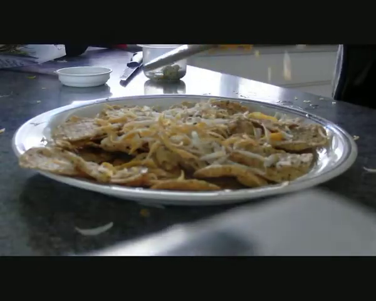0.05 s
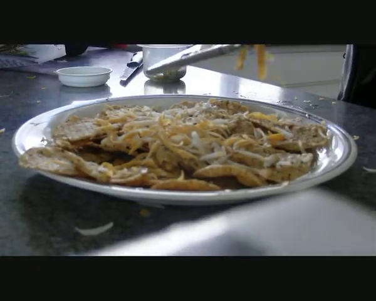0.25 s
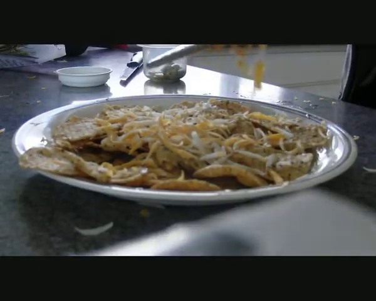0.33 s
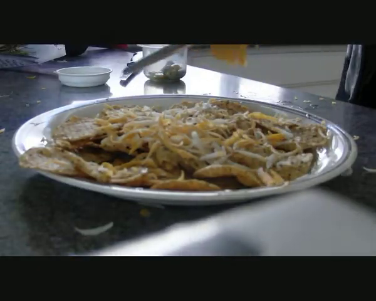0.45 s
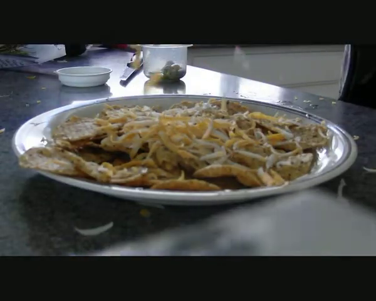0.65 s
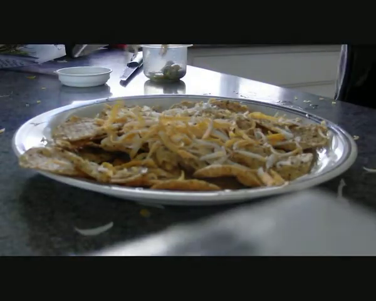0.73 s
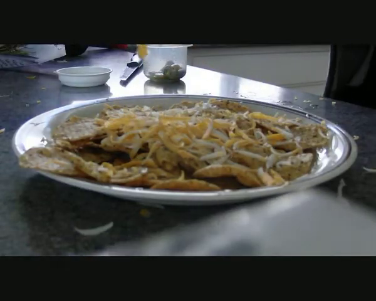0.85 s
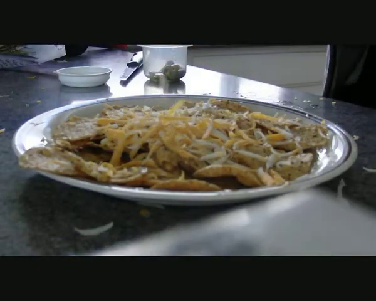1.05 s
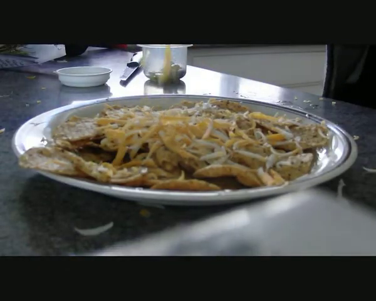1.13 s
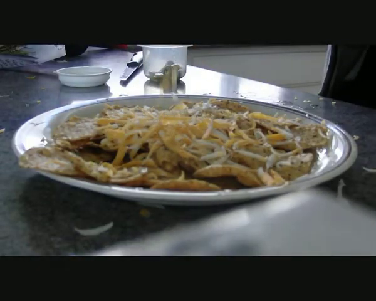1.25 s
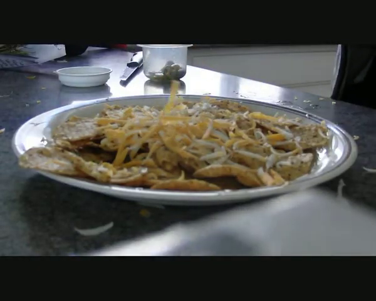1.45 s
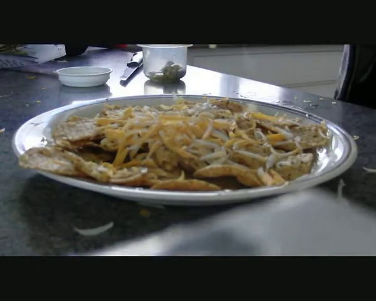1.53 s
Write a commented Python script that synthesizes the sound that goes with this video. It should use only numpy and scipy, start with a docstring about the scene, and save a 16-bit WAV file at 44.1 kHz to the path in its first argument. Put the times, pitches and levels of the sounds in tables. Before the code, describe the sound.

Shredded cheese falling onto tortilla chips with faint dry ticks and a light rustle.

```python
"""Shredded cheese is sprinkled over a plate of tortilla chips in a quiet kitchen.
From the start an appliance hums under the low rush of the room, and loose shreds rustle on the chips.
Single impacts follow, each exciting a chip's damped modes for a few cycles: a dry tick.
A touched metal utensil rings faintly, then clumps land with soft pats. After about a second
the ticks thin out. The walls add a faint reverberation throughout."""
import sys
import numpy as np
from scipy import signal
from scipy.fft import rfft, irfft
from scipy.io import wavfile

SR = 44100
rng = np.random.default_rng(int(sys.argv[2]) if len(sys.argv) > 2 else 0)


def log_audio(samples):
    """Write samples as a 16-bit WAV file to the path given in sys.argv[1]."""
    # one column per channel
    frames = np.atleast_2d(samples).T
    # limit to full scale, then quantise
    limited = np.clip(frames, -1, 1)
    pcm = np.round(limited * 32767).astype(np.int16)
    wavfile.write(sys.argv[1], SR, pcm)


N = 70560
T = np.arange(N) / SR


def from_db(db):
    """Amplitude ratio of a level: tenfold for every 20 dB."""
    return 10 ** (np.asarray(db) / 20)


def unit_energy(x):
    """Normalisation: the squared samples sum to 1."""
    return x / np.sqrt(np.sum(x ** 2) + 1e-20)


def decay(t, t60):
    """Exponential damping: the level falls 60 dB by t = t60."""
    return np.exp(-np.log(1000) * t / t60)


def butterworth(x, hz, kind, order=2):
    """Filtering with a maximally flat passband."""
    return signal.lfilter(*signal.butter(order, hz, kind, fs=SR), x)


def add(out, start_s, sound):
    """Superposition: a sound adds to the mix from its start time."""
    i = int(start_s * SR)
    out[i:i + len(sound)] += sound[:max(N - i, 0)]


def noise(spectrum):
    """Spectral shaping: white noise coloured by (Hz, dB) points, scaled to rms 1."""
    hz, db = np.transpose(spectrum)
    bin_hz = np.maximum(np.arange(N // 2 + 1) * SR / N, 1)
    gain = from_db(np.interp(np.log(bin_hz), np.log(hz), db))
    x = irfft(rfft(rng.standard_normal(N)) * gain, N)
    return x / x.std()


# Spectrum of the room's rush. Each row: frequency in Hz, relative spectral density in dB.
RUSH_SPECTRUM = [(30, -6.5), (90, -5.5), (160, -2), (230, -2), (310, -1.5), (380, -6), (560, -8.5),
                 (800, -12), (1480, -20.5), (2700, -19), (3800, -22), (5700, -30), (9000, -33.5),
                 (16000, -42)]

def room_rush(rms_db=-48.5):
    """Stationary broadband noise, strongest at low frequencies."""
    return from_db(rms_db) * noise(RUSH_SPECTRUM)


# Sustained partials of the appliance. Each row: frequency in Hz, rms level in dB.
HUM_PARTIALS = [(59.6, -68.5), (119.8, -55), (410, -64.5)]
# Envelope of a hum that comes and goes. Each row: time in seconds, rms level in dB.
HUM_SWELLS = [(.85, -62), (.97, -52), (1.14, -69), (1.22, -49.5), (1.32, -81), (1.49, -80), (1.56, -51.5)]

def appliance_hum(swell_hz=298, waver_depth=0.09):
    """Amplitude modulation: each tone wavers slightly at random, and one swells now and then."""
    out = np.zeros(N)
    swell_db = np.interp(T, *np.transpose(HUM_SWELLS))
    for hz, db in [*HUM_PARTIALS, (swell_hz, swell_db)]:
        waver = 1 + waver_depth * noise([(3, 0), (30, -40), (300, -120)])
        tone = np.sqrt(2) * np.sin(2 * np.pi * (hz * T + rng.random()))
        out += from_db(db) * waver * tone
    return out


# Envelope of the rustle. Each row: time in seconds, rms level in dB.
RUSTLE_ENVELOPE = [(0, -55), (.07, -50.5), (.17, -59), (.22, -55), (.44, -51), (.51, -52.5), (.68, -47),
                   (.72, -57.5), (.79, -46), (.87, -49.5), (.92, -58.5), (1.0, -50.5), (1.05, -65),
                   (1.22, -70), (1.33, -52), (1.53, -69)]

def shred_rustle(shreds_per_s=600, spread_db=7, centre_hz=2874, spread_octaves=0.38):
    """Incoherent summation: tiny random impacts of loose shreds on chips merge into a rustle."""
    mode_ratio, upper_db, crack_db = 1.44, 0.5, -15.5
    count = int(shreds_per_s * N / SR)
    starts = rng.uniform(0, T[-1], count)
    size, pitch = np.clip(rng.standard_normal((count, 2)), -2, 2).T
    lower_hz = centre_hz * 2 ** (spread_octaves * pitch)
    ticks = chip_ticks((start, db, hz, hz * mode_ratio, upper_db, crack_db)
                       for start, db, hz in zip(starts, spread_db * size, lower_hz))
    return ticks / ticks.std() * from_db(np.interp(T, *np.transpose(RUSTLE_ENVELOPE)))


# Shreds striking chips. Each row: start in seconds, ring energy before bass loss in dB, lower mode in Hz,
# upper mode in Hz, upper mode relative to lower in dB, crack relative to ring in dB.
CHIP_IMPACTS = [(0.0455, -20.5, 2170, 3620, 17, -10), (0.0781, -18.0, 2380, 5320, 9.5, -16),
                (0.1753, -15.5, 4040, 4800, -15, -18), (0.2021, -10.0, 2310, 5360, 8.5, -17.5),
                (0.2177, -13, 2670, 5200, 0, -16), (0.2963, -13, 4230, 7200, -4.5, -24),
                (0.3399, -15.5, 5170, 8030, -14, -17), (0.37, -21, 3400, 5030, -12, -15),
                (0.3834, -12, 2750, 3400, -16, -34), (0.401, -22, 2440, 3430, -10, -7.5),
                (0.427, -14.0, 2040, 3970, 11.5, -18), (0.4724, -6.5, 3900, 6840, -9.5, -12.5),
                (0.4954, -22, 4280, 9000, 3, -21), (0.5001, -11.5, 4570, 8200, 1.5, -13),
                (0.5104, -13.5, 2610, 5560, 8.5, -20), (0.5575, -9.0, 2300, 4350, 5.5, -28),
                (0.5698, -9, 3330, 4900, -21, -27), (0.5812, 4.5, 2950, 5240, -7.5, -24.5),
                (0.607, -16.5, 2300, 4590, 7, -25), (0.6413, -14, 2900, 2900, -15, -13),
                (0.6455, -7, 2100, 3270, 10, -22), (0.6661, -13.5, 2920, 8450, 4, -6),
                (0.6746, -12, 3970, 5960, -13, -9.5), (0.6803, -14.5, 3750, 4760, -3, -27),
                (0.6891, -18.5, 3260, 3980, -3, -33), (0.7426, -22.5, 3040, 5500, -4, 0),
                (0.7639, -17, 2970, 5680, -2, -14), (0.7659, -15, 2140, 4200, 9, -21),
                (0.8064, -16, 3400, 5240, -9, -18), (0.8102, -10.5, 3450, 6210, 2.5, -9),
                (0.8345, -17.5, 3030, 4990, -21, -34), (0.8508, -16.5, 3570, 5100, 9, -22),
                (0.8684, -17.5, 2820, 4800, 1, -7), (0.96, -18.5, 2880, 3560, 9, -32),
                (0.9694, -14.5, 3030, 4550, 6, -2.5), (0.972, -13.5, 2740, 3730, 7, -17),
                (1.0215, -24, 3470, 5670, 3, -8), (1.0913, -13.0, 2700, 3940, 3.5, -17),
                (1.1425, -19, 3300, 4370, 4, -19), (1.144, -18.0, 3300, 4440, -10, -17),
                (1.2668, -24.5, 5000, 9320, 4, -4), (1.2704, -23, 3180, 5400, 6, -4.5),
                (1.2796, -18.5, 2360, 3430, 9, -21), (1.3257, -24, 3430, 5900, 1, -1),
                (1.3342, -23, 2610, 2780, -2, -1), (1.39, -8.5, 2450, 4420, 11.5, -14.5),
                (1.4635, -20, 2080, 3640, 9, -16), (1.5682, -15.0, 2240, 3400, 14, -14.5)]

def chip_ticks(impacts, t60_cycles=10.2, crack_t60_s=0.0096):
    """Impact excitation: each hit gives a brittle crack and rings two heavily damped modes of a chip."""
    rings, cracks = np.zeros(N), np.zeros(N)
    t = np.arange(512) / SR
    contact_s = 0.0003  # soft cheese takes this long to set a chip ringing
    onset = 1 - np.exp(-t / contact_s)
    hiss = butterworth(rng.standard_normal(N + len(t)), 5350, "high")
    grit = butterworth(hiss, 8600, "low")
    for start, db, lower_hz, upper_hz, upper_db, crack_db in impacts:
        cycles = np.outer([lower_hz, upper_hz], t)
        lower, upper = decay(cycles, t60_cycles) * np.sin(2 * np.pi * cycles)
        ring = onset * (lower + from_db(upper_db) * upper)
        add(rings, start, from_db(db) * unit_energy(ring))
        crack = grit[int(start * SR):][:len(t)] * decay(t, crack_t60_s)
        add(cracks, start, from_db(db + crack_db) * unit_energy(crack))
    return butterworth(rings, 1710, "high", order=4) + cracks  # chips are too small to radiate bass


# Modes of the utensil. Each row: frequency in Hz, relative level in dB, 60 dB decay time in seconds.
METAL_MODES = [(1853, 0, 0.23), (2740, 0, 0.084), (3775, 1, 0.095), (4700, -7, 0.044), (7300, -21, 0.12),
               (8800, -13, 0.052), (9030, -15, 0.14), (10700, -19, 0.15), (12300, -21, .1)]
# Touches on it. Each row: start in seconds, level in dB, gains of the first and third modes in dB.
UTENSIL_TOUCHES = [(.1410, -48.5, -14, 3), (0.4429, -47, 1, -20), (1.1495, -51, -3, 2)]

def utensil_ring():
    """Free vibration of metal: the point of contact sets how much the first and third modes sound."""
    out = np.zeros(N)
    for k, (hz, mode_db, t60) in enumerate(METAL_MODES):
        ring = np.sin(2 * np.pi * hz * T) * decay(T, t60)
        for start, db, first_db, third_db in UTENSIL_TOUCHES:
            position_db = first_db * (k == 0) + third_db * (k == 2)
            add(out, start, from_db(db + mode_db + position_db) * ring)
    return out


# Clumps of cheese landing. Each row: start in seconds, energy in dB.
CLUMP_LANDINGS = [(0.217, -22), (0.384, -21.5), (0.4989, -18), (0.5572, -15), (.7640, -19.5), (0.8307, -23),
                  (0.972, -26)]

def clump_pats(t60_s=0.028, band_hz=(693, 2270)):
    """Soft impact: a clump lands with a dull, quickly damped burst of band-limited noise."""
    out = np.zeros(N)
    envelope = decay(np.minimum(T, 10 * t60_s), t60_s)
    for start, db in CLUMP_LANDINGS:
        pat = butterworth(rng.standard_normal(N) * envelope, band_hz, "band")
        add(out, start, from_db(db) * unit_energy(pat))
    return out


# Spectrum of the kitchen's reverberation. Each row: frequency in Hz, relative level in dB.
REVERB_SPECTRUM = [(300, 8), (1000, 11), (2700, -2.5), (5000, 2.5), (9000, 2.6)]

def kitchen_reverb(direct, level_db=-12.5, t60_s=0.35, delay_s=0.00153):
    """Diffuse reflection from the walls: convolution with a decaying tail of noise."""
    tail = noise(REVERB_SPECTRUM) * decay(T, t60_s) * (T > delay_s)
    return from_db(level_db) * signal.fftconvolve(direct, unit_energy(tail))[:N]


def scene():
    """Superposition of the background, the direct sound of the nearby plate and its reverberation."""
    background = room_rush() + appliance_hum()
    plate = chip_ticks(CHIP_IMPACTS) + clump_pats() + shred_rustle() + utensil_ring()
    return (background + plate + kitchen_reverb(plate))[None]


def record(dry, notch_hz=7910, cutoff_hz=16100):
    """Frequency response: the microphone has a narrow dip, and a steep low-pass limits the bandwidth."""
    notched = signal.lfilter(*signal.iirnotch(notch_hz, Q=20, fs=SR), dry)
    low_pass = signal.ellip(10, .3, 70, cutoff_hz, fs=SR, output="sos")
    return signal.sosfilt(low_pass, notched)


dry = scene()
out = record(dry)
log_audio(out)
```